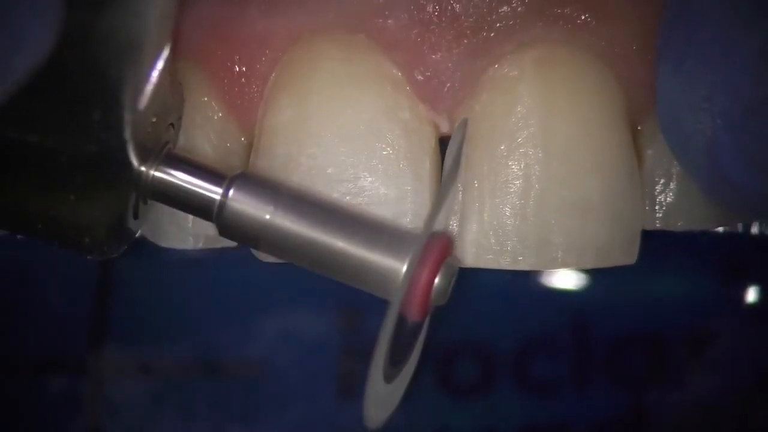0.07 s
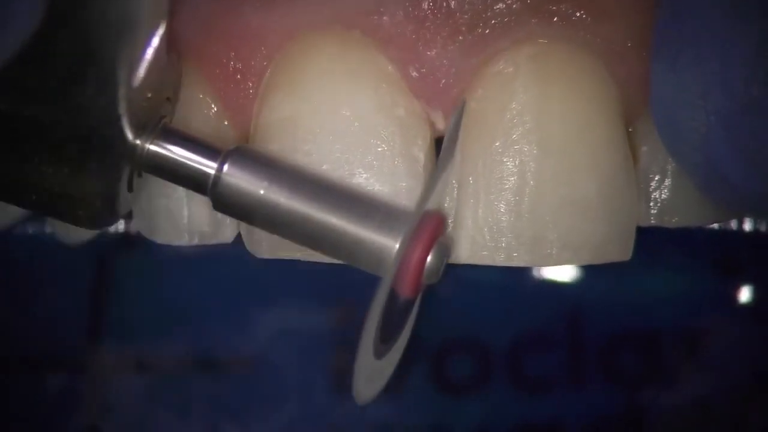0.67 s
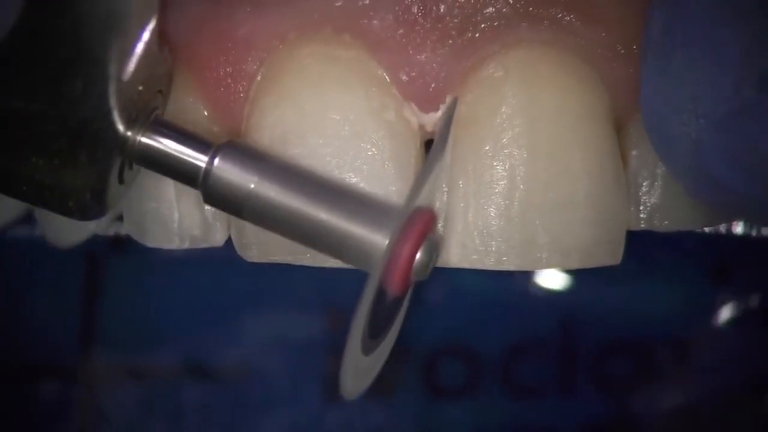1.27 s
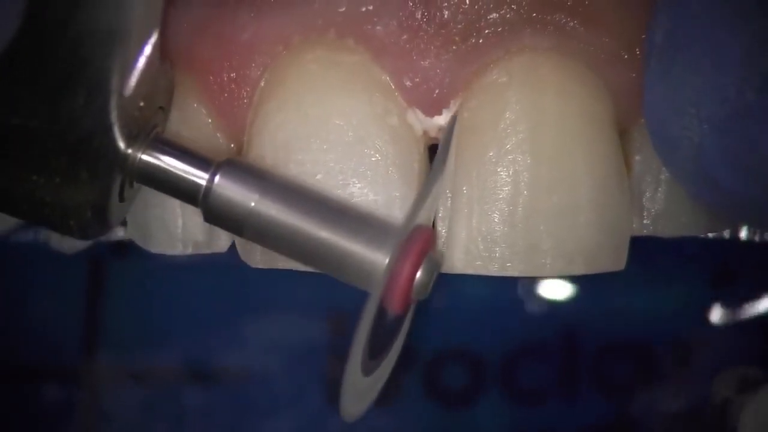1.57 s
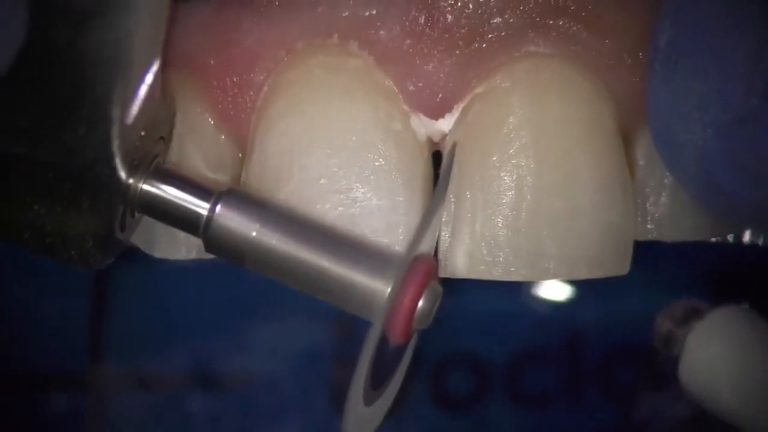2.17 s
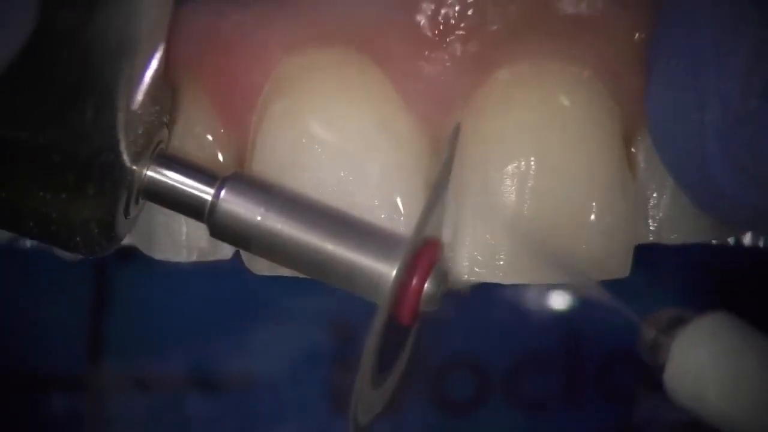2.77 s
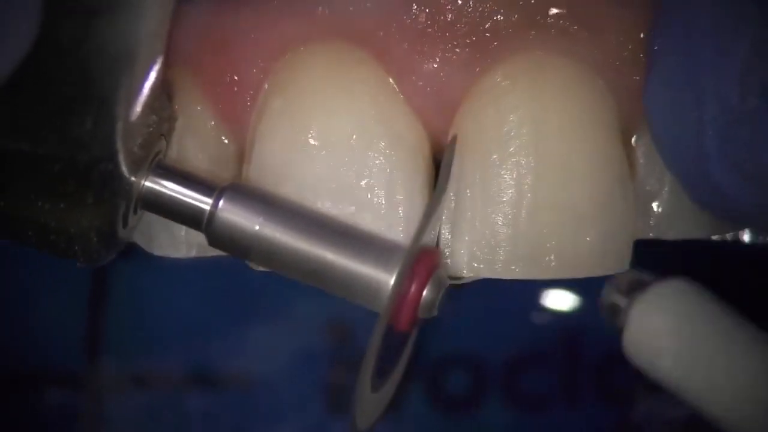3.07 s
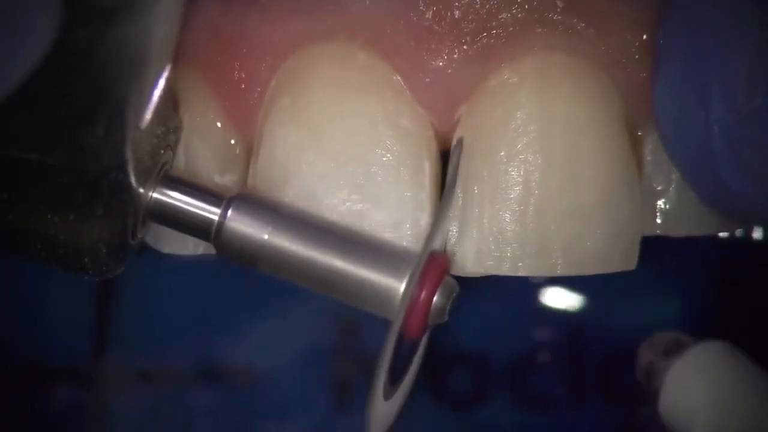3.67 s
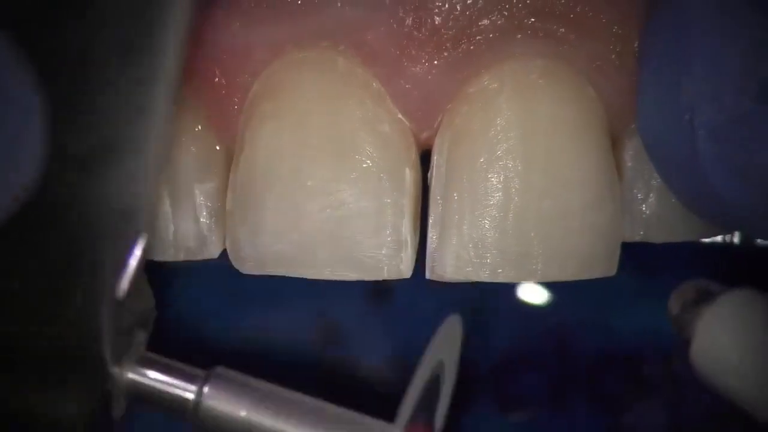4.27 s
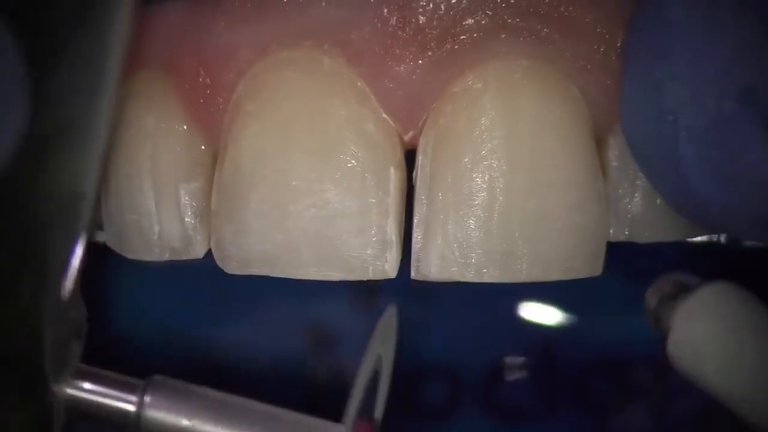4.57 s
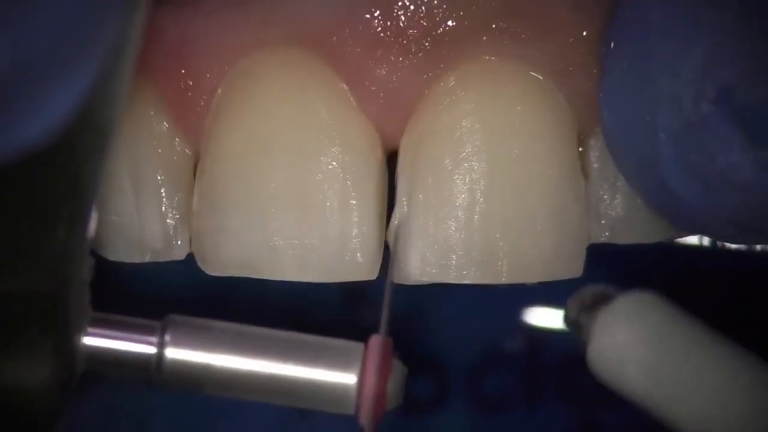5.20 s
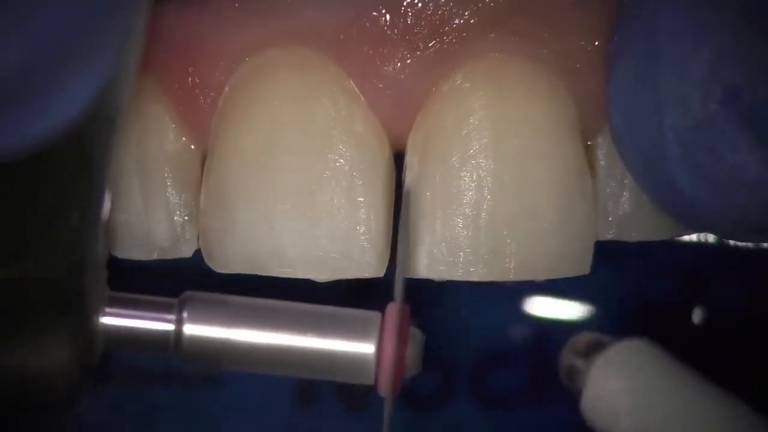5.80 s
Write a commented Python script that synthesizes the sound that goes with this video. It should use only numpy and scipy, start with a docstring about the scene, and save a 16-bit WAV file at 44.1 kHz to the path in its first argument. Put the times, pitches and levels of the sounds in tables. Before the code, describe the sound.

A brief puff of air fades over the thin hiss of a dental suction tube. An air and water spray opens with a loud wet spurt, then settles into a bright, continuous fizz that spits a few times later on. Beneath it, a handpiece whirrs with a hollow, wavering note while its disc scrapes and faintly rings against teeth. Heard very close in a small treatment room with low ventilation rumble.

```python
"""A dental handpiece turns a polishing disc between two front teeth, in a small treatment room.
A brief air hiss dies away; the air valve opens with a wet spurt and the stream fizzes and spits.
The disc scrapes and rings over a hollow whirr that sags under load. A suction tube hisses throughout.
Hard surfaces close by colour these sounds; ventilation rumbles and machines hum behind."""
import sys
import numpy as np
from scipy import signal
from scipy.fft import rfft, irfft
from scipy.io import wavfile
from scipy.ndimage import map_coordinates

SR = 44100
rng = np.random.default_rng(int(sys.argv[2]) if len(sys.argv) > 2 else 0)


def file_out(sig):
    """Save sig as 16-bit WAV at sys.argv[1]."""
    # one column per channel
    cols = np.atleast_2d(sig).T
    # limit, then scale
    lim = np.clip(cols, -1, 1)
    pcm = np.round(lim * 32767).astype(np.int16)
    wavfile.write(sys.argv[1], SR, pcm)


N = 266364
TIME_S = np.arange(N) / SR
BINS_HZ = np.fft.rfftfreq(N, 1 / SR)

# Spectra: f/Hz, relative density/dB
SUCTION_SPECTRUM = [(720, -23), (980, -8), (1500, -6.5), (2300, -6.5), (3400, -1), (4600, -2), (5150, -0.5),
                    (5700, 0), (6200, 2.5), (6900, -8.5), (7900, -9.5), (9400, -5), (12400, -17),
                    (15700, -16)]
RUMBLE_SPECTRUM = [(12, -31), (20, 4.5), (43, -4.5), (70, -8.5), (156, -4.5), (293, -9.5), (322, -7.5),
                   (353, -10.5), (399, -8.5), (445, -12.5), (511, -11.5), (597, -14.5), (800, -13),
                   (1040, -13), (1760, -120)]
JET_SPECTRUM = [(3500, -18), (4900, -8), (5150, -7.5), (5450, -6), (5850, -1), (6150, -2.5), (6600, -5.5),
                (7150, -5.5), (7480, -10.5), (7830, -19), (7970, -70), (10000, -32)]
RUSH_SPECTRUM = [(300, -29.5), (700, -19.5), (1500, -16.5), (1850, -16.5), (2450, -7.5), (3100, -8),
                 (3500, -1.5), (4000, -2.5), (4350, 2), (4750, -7.5), (5300, -15), (7500, -48)]
MIST_SPECTRUM = [(5000, -35), (7000, -11.5), (7850, 5.5), (7970, -3), (8170, -6), (8300, 1), (8650, 3),
                 (9200, 0), (9900, -3.5), (10330, -4), (10470, -16), (11600, -11), (12600, -14),
                 (14500, -11), (15800, -13.5)]
# Ventilation resonances: f/Hz, width/Hz, level/dB
VENT_MODES = [(37.5, 3, -47.5), (135, 11, -55.5), (170, 24, -55), (402, 45, -52.5)]
# Machine hum: f/Hz, level/dB
HUM_TONES = [(200, -62), (215.5, -58), (322, -59)]
# Short bursts, an air hiss dying away at the start, then water spits:
# t/s, level/dB, length/s, decay/s, f/Hz, width/Hz, splutter/dB, puff/dB
SHORT_BURSTS = [(0, -26, 0.0064, 0.037, 4800, 8400, -69, -45),
                (0.564, -32, 0.14, .03, 6860, 4250, -45.5, -51),
                (3.389, -12, 0.026, 0.018, 5520, 4000, -45.5, -28.5),
                (3.7, -16, .005, 0.058, 5700, 3400, -59, -40),
                (4.323, -49, 0.055, 0.044, 4000, 3500, -42.5, -55),
                (4.783, -18, 0.0051, 0.043, 3740, 2800, -39, -37),
                (4.813, -27, 0.022, 0.041, 3600, 2200, -35, -45)]
# Air path resonances: f/Hz, width/Hz, gain/dB
AIR_PATH_MODES = [(3432, 40, -5.5), (3685, 26, -1.5), (4430, 28, -8.5), (4170, 37, -4.5), (4480, 18, 7.5),
                  (4500, 25, -8), (5220, 29, 8.5), (5170, 25, 0), (5450, 53, 6), (5570, 160, 7),
                  (5520, 36, -8), (5630, 40, 2), (6500, 25, 3), (6470, 31, 3.5), (6562, 30, -5),
                  (6681, 15, 4.5), (5680, 36, -9), (6431, 23, -3.5), (3880, 23, -18)]
# Flow as the nozzle moves about the teeth: t/s, relative level/dB
NOZZLE_FLOW = [(.55, -0.5), (.87, -3), (1.25, 2), (2.1, 1), (2.6, .5), (2.78, -1.4), (3.3, 3), (3.6, 1),
               (4.25, -1.5), (4.95, -2), (6.04, 0.7)]
# Stream parts: base level/dB, flow slope/(dB/dB), surge/dB, leak swell/(dB/s)
JET_DRIVE = (-22.5, 1.0, 11.5, 134)
RUSH_DRIVE = (-26.5, 0.5, 6, 46.5)
MIST_DRIVE = (-29, 0.7, 8, 260)
# Mist thinning: t/s, dip/dB, length/s
MIST_LULLS = [(2.7, 1.5, 0.19), (4.9, 4, .13)]
# Disc on the teeth: t/s, relative scrape level/dB, relative ring level/dB
DISC_CONTACT = [(.5, -46, -58), (.6, -33, -15), (.85, -35.5, -29.5), (1.1, -34.5, -30), (1.27, -27, -21),
                (1.45, -34.5, -29), (1.6, -29.5, -23), (1.8, -41, -30), (2.25, -36, -27), (2.8, -42, -36),
                (3.05, -38, -25.5), (3.6, -41, -23.5), (4.2, -40.5, -49), (5.2, -39.5, -35),
                (6.04, -36.5, -34)]
# Scrape resonance, rising as the disc bites: t/s, f/Hz
SCRAPE_PITCH = [(.55, 2639), (1.27, 2863), (6.04, 2486)]
# Whirr under load: t/s, level/dB, f/Hz
WHIRR_TRACK = [(.6, -30, 1066), (.74, -29.5, 1035), (.85, -35, 1055), (1.08, -33.5, 1157), (1.4, -32, 1118),
               (1.75, -34, 1144), (1.91, -32, 1214), (2.04, -30.5, 1114), (2.28, -33, 1115),
               (2.35, -33, 1225), (2.5, -31, 1198), (2.85, -33.5, 1177), (3.1, -31.5, 1225),
               (3.29, -33.5, 1139), (3.56, -35, 1194), (3.76, -31.5, 1196), (4.2, -35.5, 1175),
               (4.48, -32, 1231), (5.05, -34.5, 1151), (5.62, -31, 1133), (6.04, -32.5, 1113)]
# Whirr spectrum: multiple of pitch, relative density/dB
WHIRR_SPECTRUM = [(.3, -38), (.72, -17), (.8, -6), (.88, -5.5), (1, 1), (1.09, -3.5), (1.2, -8.5),
                  (1.35, -16), (1.8, -22.5), (3, -55)]
# Close reflections: delay/ms, signed relative gain
REFLECTIONS = [(5.714, .13), (7.528, -.12), (8.594, -.15), (8.844, .12), (11.088, .13), (12.381, -.11),
               (14.24, -.12), (15.034, -.17), (15.556, .13), (21.6, -.09)]
# Stereo width: f/Hz, side re mid/dB
SIDE_SPECTRUM = [(20, -19), (90, -21), (140, -41), (350, -25.5), (750, -22), (1000, -54), (1700, -48),
                 (2000, -67), (4000, -74), (4400, -74), (7400, -77), (7750, -4), (8200, -17), (10300, -24),
                 (10600, -39), (16000, -32)]


def amp(db):
    return 10 ** (np.asarray(db) / 20)


def unit_rms(x):
    return x / np.sqrt(np.mean(x ** 2) + 1e-20)


def follow(rows):
    """Columns of a time table at every sample."""
    times_s, *columns = np.transpose(rows)
    return [np.interp(TIME_S, times_s, column) for column in columns]


def colour(spectrum, hz=BINS_HZ):
    """Gain of a spectrum table; 18 dB/octave roll-off past its ends."""
    f, db = np.transpose(sorted(spectrum))
    hz = hz + 1e-6
    roll_off = np.minimum(1, hz / f[0]) ** 3 * np.minimum(1, f[-1] / hz) ** 3
    return amp(np.interp(np.log(hz), np.log(f), db)) * roll_off


def bell(centre_hz, width_hz):
    """Gain of one resonance."""
    return 1 / np.sqrt(1 + (2 * (BINS_HZ - centre_hz) / width_hz) ** 2)


def shaped(x, gain):
    """Filter to unit RMS."""
    return unit_rms(irfft(rfft(x) * gain, N))


def noise(gain):
    return shaped(rng.standard_normal(N), gain)


def wander(rate_hz):
    """Random drift, unit RMS."""
    return noise(1 / (1 + (BINS_HZ / rate_hz) ** 4))


def glide(x, ratio):
    """Resample noise so its resonance follows the ratio."""
    return map_coordinates(x, [np.cumsum(ratio) % (N - 1)], order=3, mode="wrap")


def pulse(start_s, attack_s, length_s, decay_s):
    """Linear rise, hold, exponential fall."""
    age_s = TIME_S - start_s
    return np.clip(age_s / attack_s, 0, 1) * np.exp(-np.maximum(age_s - length_s, 0) / decay_s)


def seconds_until(t_s):
    return np.maximum(t_s - TIME_S, 0)


def suction(hiss_db=-33, whistle_db=-47, whistle_hz=2100):
    """Suction tube: steady thin hiss, faint whistle at the tip."""
    hiss = amp(hiss_db) * noise(colour(SUCTION_SPECTRUM))
    return hiss + amp(whistle_db) * noise(bell(whistle_hz, width_hz=70) ** 2)


def machines(rumble_db=-42.5, drift_rad=0.38):
    """Ventilation rumble with low resonances, plus faint machine hum."""
    rumble = amp(rumble_db) * noise(colour(RUMBLE_SPECTRUM))
    drone = sum(amp(db) * noise(bell(hz, width_hz) ** 2) for hz, width_hz, db in VENT_MODES)
    hum = np.zeros(N)
    for hz, db in HUM_TONES:
        phase = 2 * np.pi * (hz * TIME_S + rng.random()) + drift_rad * wander(rate_hz=2.7)
        hum += amp(db) * np.sqrt(2) * np.sin(phase)
    return rumble + drone + hum


def spray(drops_per_s, drop_share):
    """Turbulence plus ticks of unevenly sized droplets, mixed by power."""
    sizes = amp(3 * np.minimum(rng.exponential(1, N), 4))
    drops = rng.choice([-1, 1], N) * sizes * (rng.random(N) < drops_per_s / SR)
    return np.sqrt(1 - drop_share) * rng.standard_normal(N) + np.sqrt(drop_share) * unit_rms(drops)


def air_path():
    """Gain of the narrow resonances around the mouth."""
    return 1 + sum((amp(db) - 1) * bell(hz, width_hz) ** 2 for hz, width_hz, db in AIR_PATH_MODES)


def short_bursts(attack_s=0.0025, splutter_hz=545, puff_hz=1140):
    """An air hiss dies away at the start, then water spits: each a hiss over a splutter and a puff."""
    out, path = np.zeros(N), air_path()
    for start_s, db, length_s, decay_s, hz, width_hz, splutter_db, puff_db in SHORT_BURSTS:
        fizz = spray(drops_per_s=2500, drop_share=0.3)
        hiss = amp(db) * shaped(fizz, bell(hz, width_hz) ** 3 * path)
        splutter = amp(splutter_db) * shaped(fizz, bell(splutter_hz, width_hz=400) ** 3)
        puff = amp(puff_db) * shaped(fizz, bell(puff_hz, width_hz=450) ** 3)
        out += pulse(start_s, attack_s, length_s, decay_s) * (hiss + splutter + puff)
    return out


def valve_db(drive, open_s=0.552, sag_per_s=3.6):
    """The valve leaks, then snaps open; stored pressure surges, sags and gives way to the flow."""
    base_db, flow_slope, surge_db, swell_db_per_s = drive
    flow_db, = follow(NOZZLE_FLOW)
    sag = np.exp(-sag_per_s * np.maximum(TIME_S - open_s, 0))
    surge = sag * pulse(open_s, attack_s=0.0092, length_s=0.2, decay_s=0.025)
    return base_db + flow_slope * flow_db + surge_db * surge - swell_db_per_s * seconds_until(open_s)


def mist(growth_db_per_s=0.9, pivot_s=3.4):
    """High fizz of mist: thickens steadily, comes unevenly, thins in brief lulls."""
    lull_db = sum(dip_db * pulse(start_s, 0.04, length_s, decay_s=0.26)
                  for start_s, dip_db, length_s in MIST_LULLS)
    level_db = valve_db(MIST_DRIVE) + growth_db_per_s * (TIME_S - pivot_s) - lull_db
    level_db += 0.45 * wander(rate_hz=9)
    return amp(level_db) * shaped(spray(drops_per_s=3000, drop_share=0.26), colour(MIST_SPECTRUM))


def air_stream(leak_s=0.35, leak_attack_s=0.036):
    """Jet and rush ring in the air path; they share one flow and flutter with the mist."""
    jet = shaped(spray(drops_per_s=2700, drop_share=0.16), colour(JET_SPECTRUM) * air_path())
    rush = shaped(spray(drops_per_s=3000, drop_share=0.25), colour(RUSH_SPECTRUM) * air_path())
    stream = amp(valve_db(JET_DRIVE)) * jet + amp(valve_db(RUSH_DRIVE)) * rush + mist()
    onset = np.clip((TIME_S - leak_s) / leak_attack_s, 0, 1)
    flutter_db = 0.04 * wander(rate_hz=200) + 0.51 * wander(rate_hz=7)
    return onset * stream * amp(flutter_db)


def disc(grit_hz=4000, ring_hz=5520, turn_hz=125, wobble_depth=0.09, approach_db_per_s=50):
    """Grit scrapes enamel, harder once per turn; pinched between the teeth, the disc rings."""
    rub_db, pinch_db = follow(DISC_CONTACT)
    scrape_hz, = follow(SCRAPE_PITCH)
    mean_hz = np.mean(scrape_hz)
    scrape = amp(rub_db - 1) * glide(noise(bell(mean_hz, width_hz=280) ** 2), scrape_hz / mean_hz)
    grit = amp(rub_db + 2) * noise(bell(grit_hz, width_hz=1300) ** 3 * air_path())
    ring = amp(pinch_db - 1) * noise(bell(ring_hz, width_hz=460) ** 2)
    turns = np.cumsum(turn_hz * (1 + 0.043 * wander(rate_hz=3.1))) / SR
    approach = amp(-approach_db_per_s * seconds_until(DISC_CONTACT[0][0]))
    return approach * (scrape + grit + ring) * (1 + wobble_depth * np.cos(2 * np.pi * turns))


def whirr(swell_db_per_s=90, full_s=0.66, hose_spacing_hz=69, ripple_depth=0.14, low_cut_hz=870):
    """Breathy handpiece note: builds, wavers, sags under load across its hose's standing waves."""
    level_db, pitch_hz = follow(WHIRR_TRACK)
    mean_hz = np.mean(pitch_hz)
    breath = noise(colour(WHIRR_SPECTRUM, BINS_HZ / mean_hz))
    note = glide(breath, pitch_hz / mean_hz * (1 + 0.012 * wander(rate_hz=14)))
    hose = 1 + ripple_depth * np.cos(2 * np.pi * BINS_HZ / hose_spacing_hz)
    high_pass = 1 / np.sqrt(1 + (low_cut_hz / (BINS_HZ + 1)) ** 20)
    swell_db = -swell_db_per_s * seconds_until(full_s)
    flutter_db = 0.5 * wander(rate_hz=45)
    return shaped(note, hose * high_pass) * amp(level_db + swell_db + flutter_db)


def room(x, echo_db=-2, tail_db=-19, t60_s=0.17, predelay_s=0.008):
    """Close reflections comb the sound; a short diffuse tail follows."""
    t = TIME_S[:SR // 3]
    response = rng.standard_normal(len(t)) * amp(-60 * t / t60_s) * (t > predelay_s)
    response *= amp(tail_db) / np.linalg.norm(response)
    response[0] = 1
    for delay_ms, gain in REFLECTIONS:
        response[round(delay_ms * SR / 1000)] += gain * amp(echo_db)
    return signal.fftconvolve(x, response / np.linalg.norm(response))[:N]


def scene():
    """Near-mono mix; a little arrives 25 ms late from the sides."""
    mid = room(suction() + short_bursts() + air_stream() + disc() + whirr()) + machines()
    late = np.roll(mid, SR // 40)
    side = irfft(rfft(late) * colour(SIDE_SPECTRUM), N)
    return np.array([mid + side, mid - side])


def record(dry, ceiling=0.85, cutoff_hz=15780):
    """Soft peak limit, then low-pass."""
    limited = dry / (1 + (dry / ceiling) ** 8) ** (1 / 8)
    low_pass = signal.firwin(1201, cutoff_hz, window=("kaiser", 11), fs=SR)
    return signal.oaconvolve(limited, low_pass[None], "same")


dry = scene()
out = record(dry)
file_out(out)
```